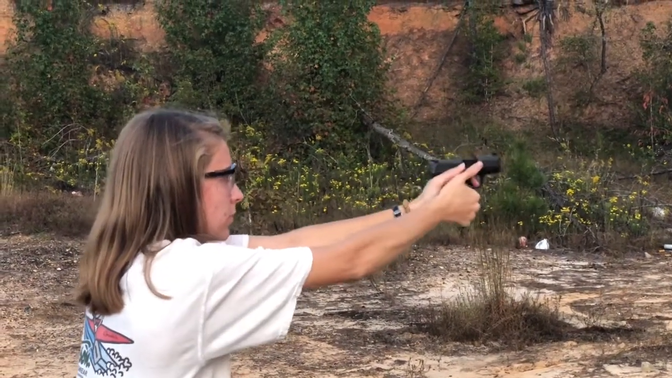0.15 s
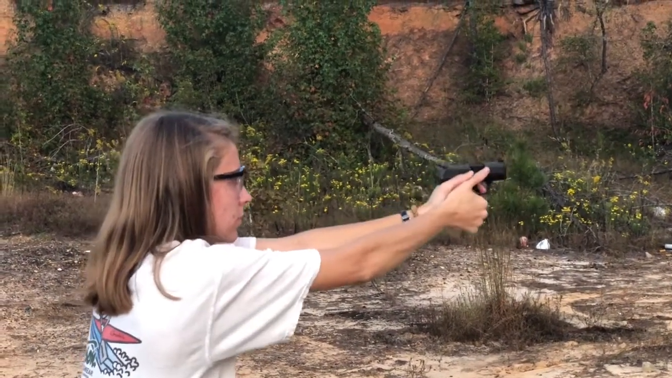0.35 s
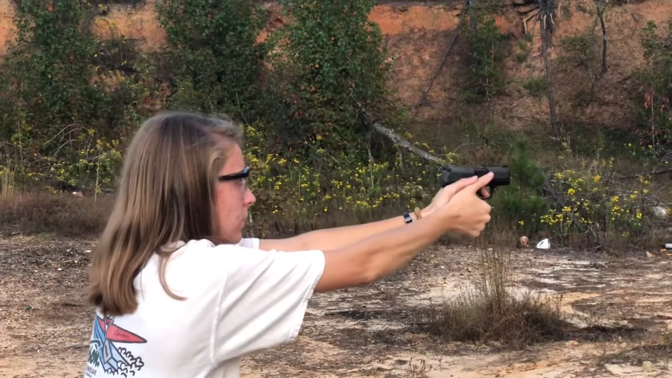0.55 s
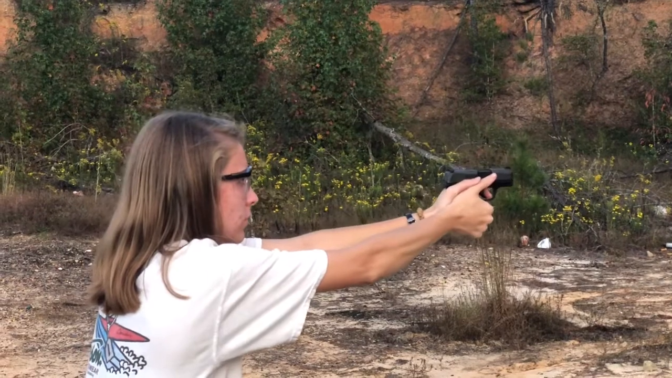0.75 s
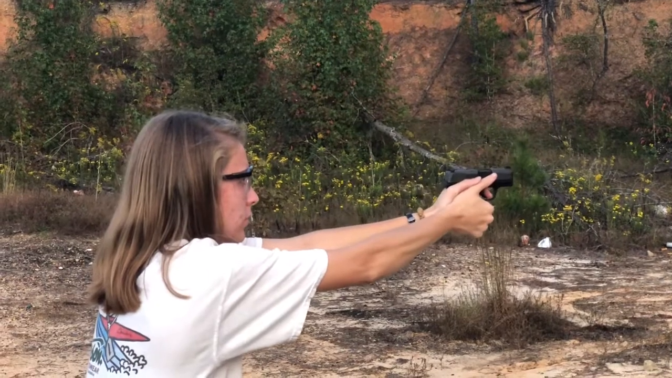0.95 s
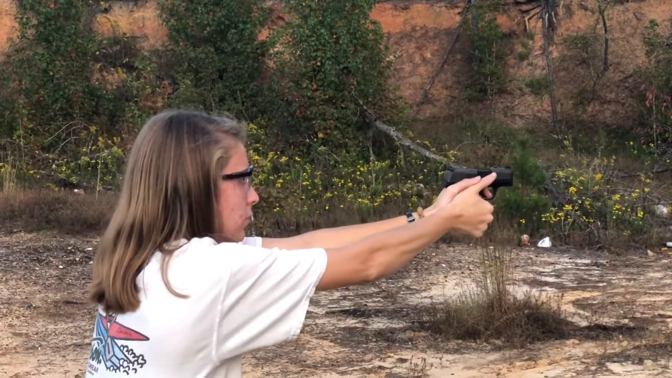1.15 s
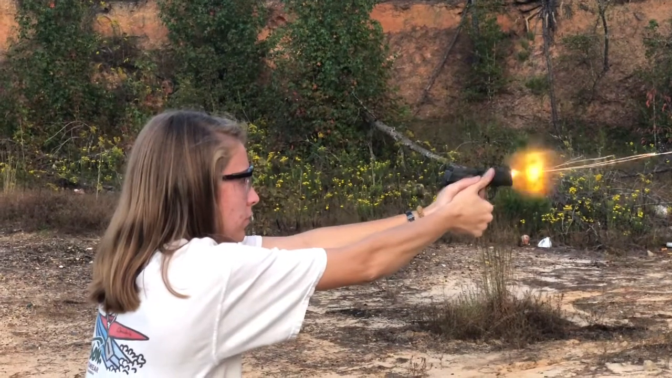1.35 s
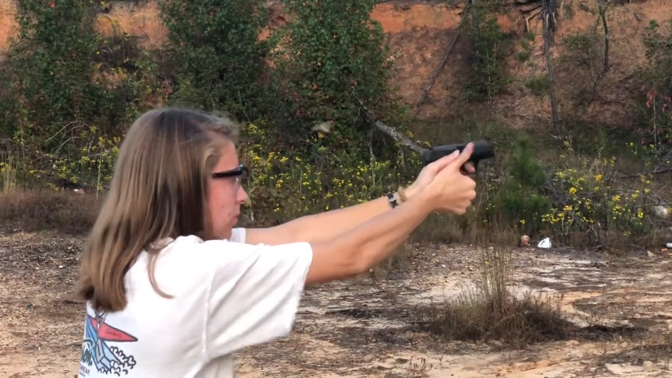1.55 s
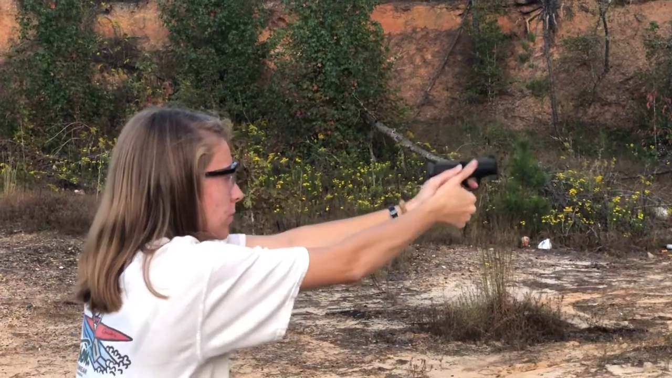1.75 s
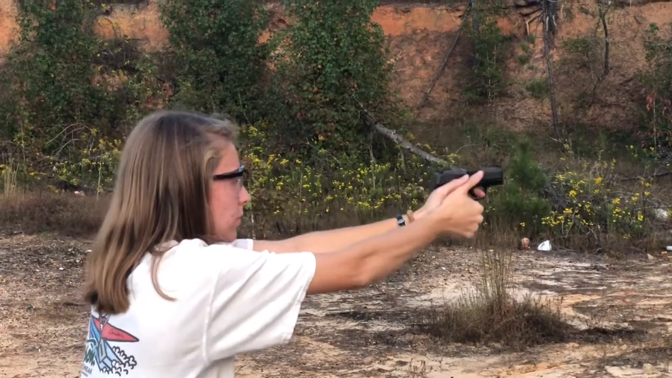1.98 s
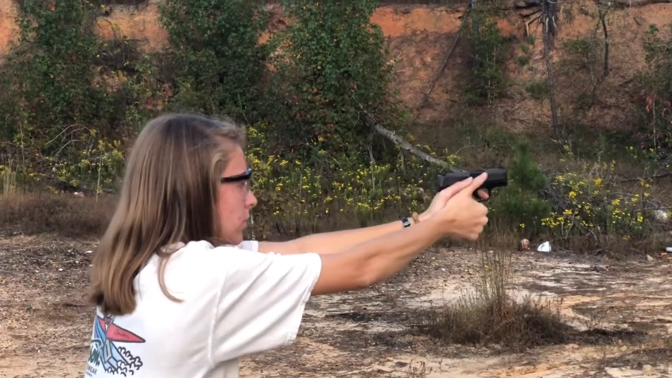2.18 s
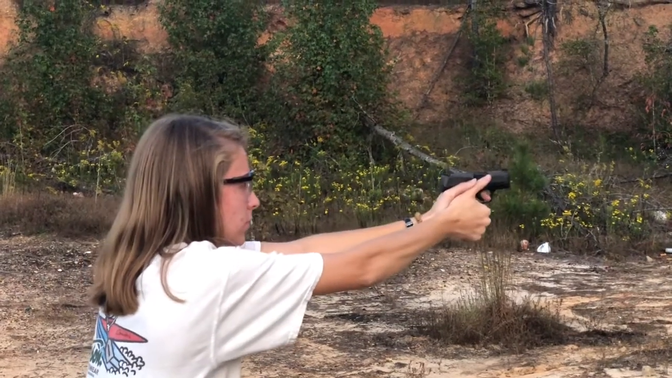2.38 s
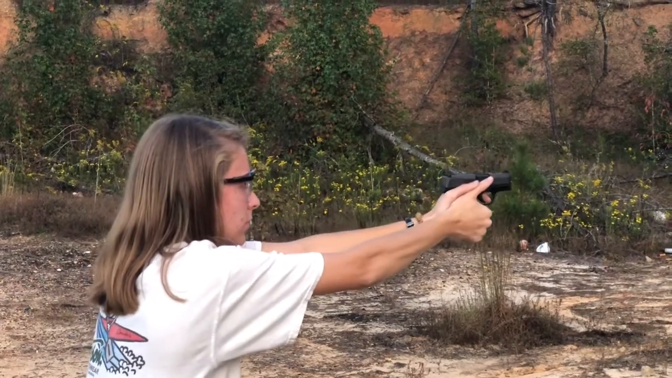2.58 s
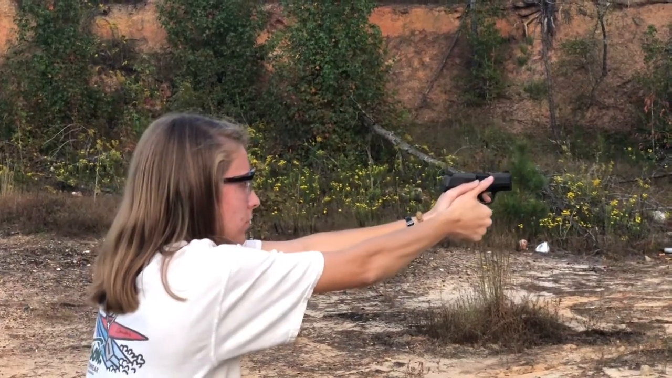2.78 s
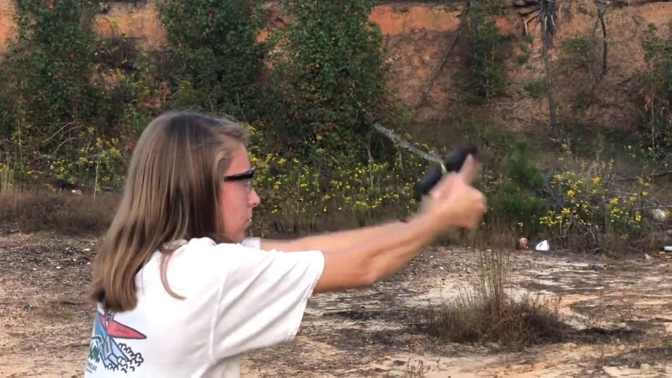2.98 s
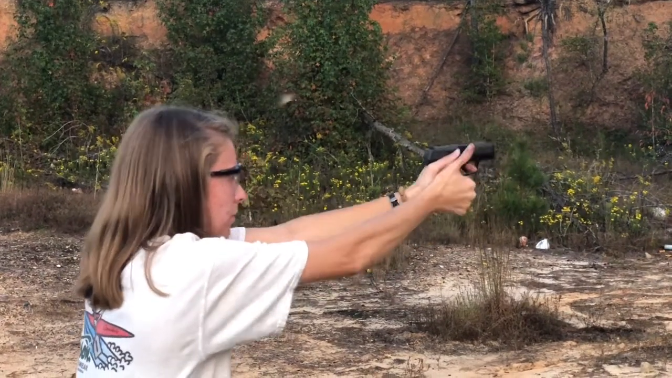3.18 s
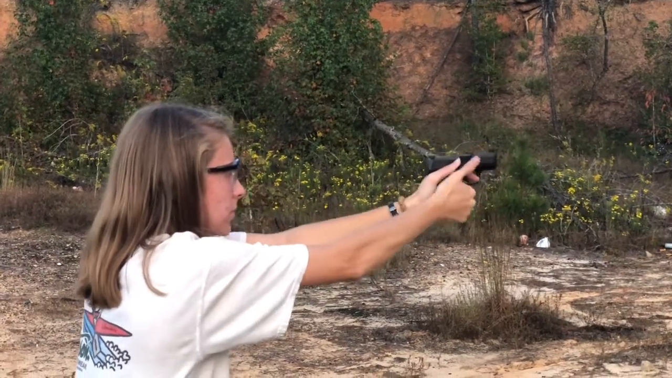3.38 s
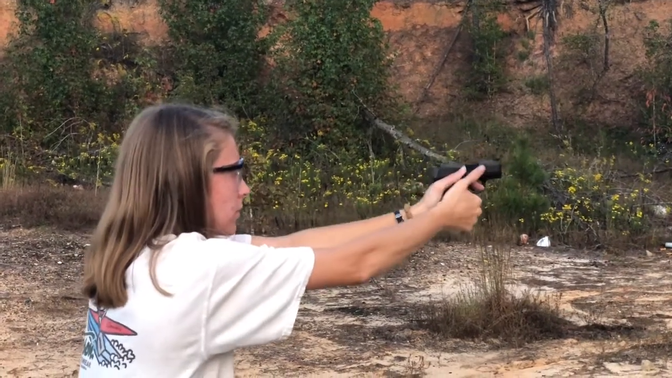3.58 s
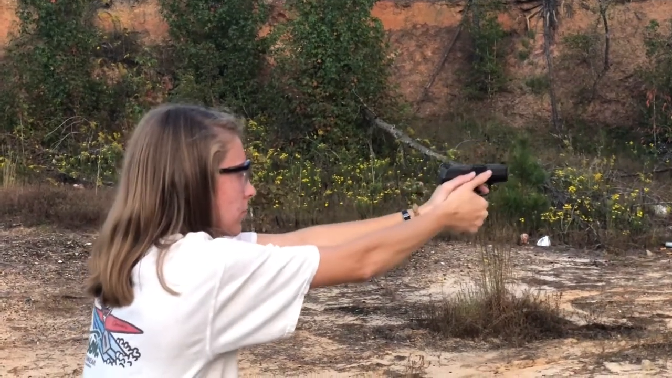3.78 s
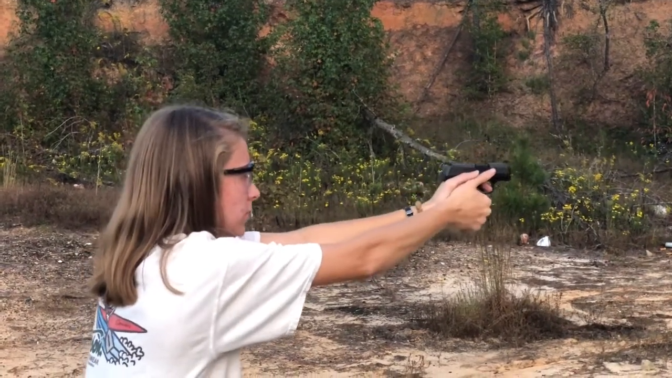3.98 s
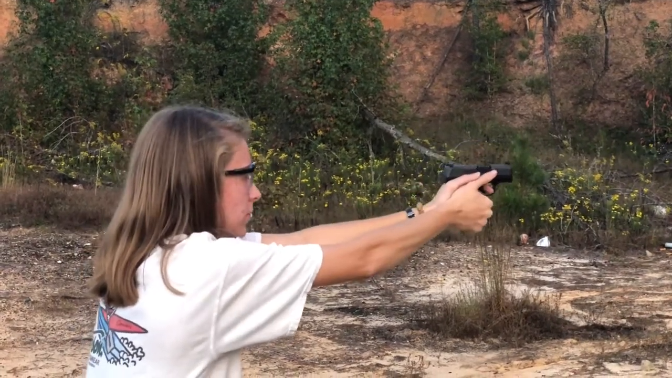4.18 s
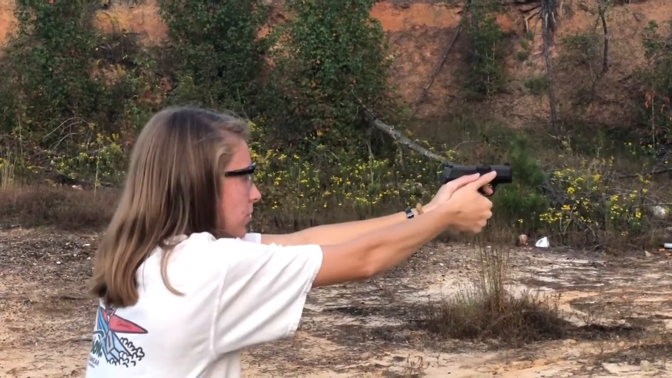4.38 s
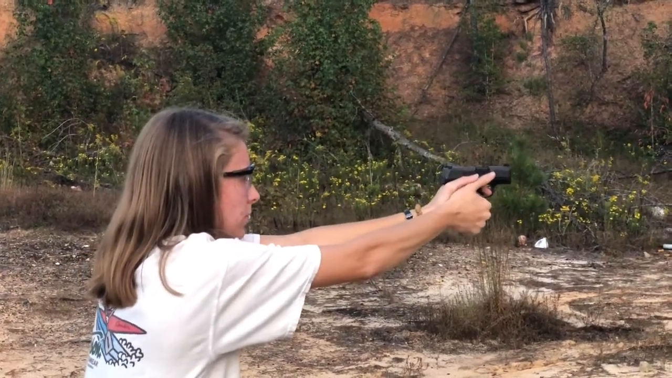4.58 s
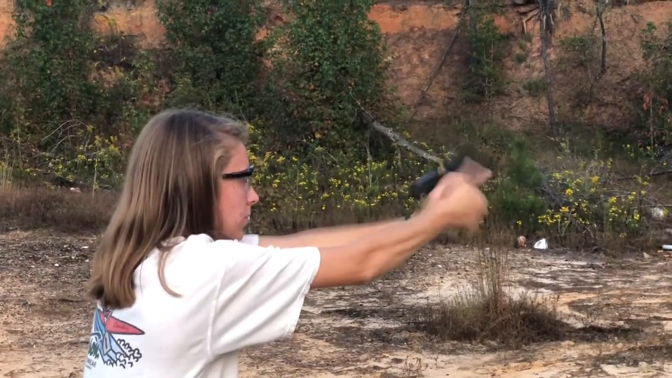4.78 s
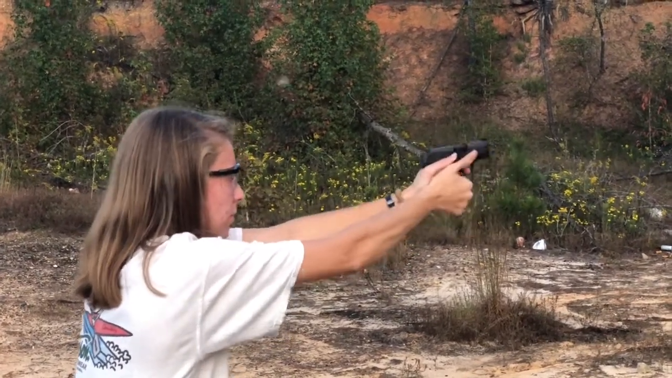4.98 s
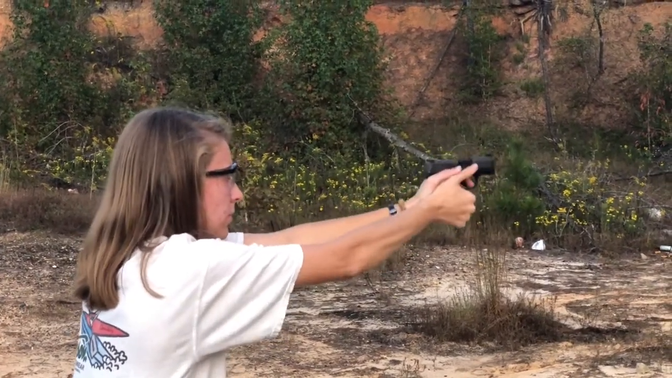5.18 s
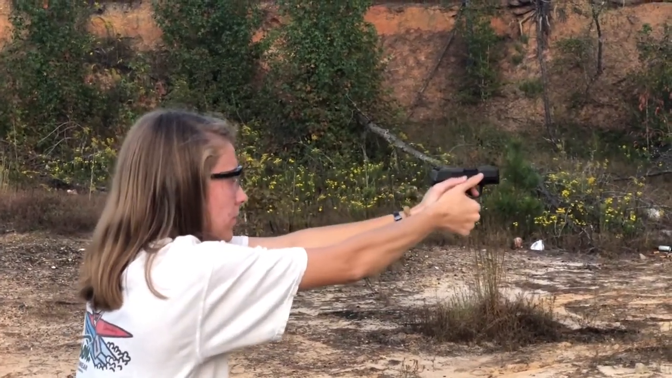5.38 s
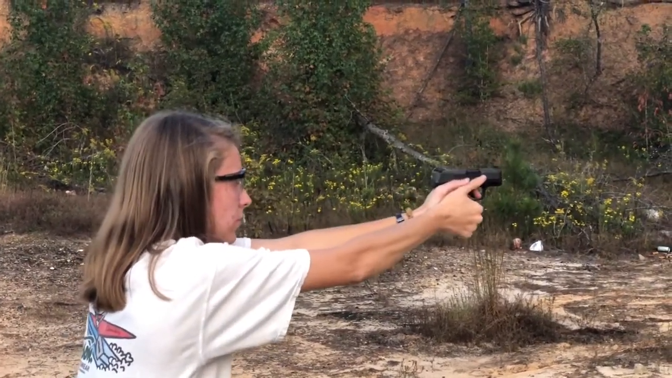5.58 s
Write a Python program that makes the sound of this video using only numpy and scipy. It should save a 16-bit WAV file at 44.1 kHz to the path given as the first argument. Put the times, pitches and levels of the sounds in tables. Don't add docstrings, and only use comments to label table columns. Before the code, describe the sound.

Three spaced pistol shots crack and overload the microphone outdoors, each echoing off banks and trees, with faint clicks and falling brass between.

```python
import sys
import numpy as np
from scipy import signal
from scipy.fft import rfft, irfft
from scipy.io import wavfile
from scipy.ndimage import uniform_filter1d

SR = 44100
rng = np.random.default_rng(int(sys.argv[2]) if len(sys.argv) > 2 else 0)


def elevation(decibels):
    levels = np.asarray(decibels, float)
    return 10 ** (levels / 20)


def digitize_waveform(pressure):
    field = np.atleast_2d(pressure).T
    bounded = np.clip(field, -1, 1)
    quanta = np.round(bounded * 32767).astype(np.int16)
    wavfile.write(sys.argv[1], SR, quanta)


N = 248724
ECHO_N = int(1.8 * SR)

# [f/Hz, level/dB per Hz]
AIR_SPECTRUM = [(25, -15), (45, -3), (75, 4), (130, -4.5), (250, -14.5), (400, -14), (700, -10.5),
                (1200, -3.5), (1900, -21), (3000, -21), (5000, -27.5), (8500, -29), (12000, -31),
                (16000, -28)]
AIR_DB = -66
INSECT_HZ, INSECT_WIDTH_HZ, INSECT_DB = 3990, 740, -72.5
DUCK_DB, DUCK_HOLD_S, DUCK_BACK_S = -12.5, 0.56, 0.44
# [busiest t/s, rate/grains per s]
RUSTLES = [
    (1.05, 90),
    (2.6, 400),
    (4.4, 430),
]
RUSTLE_DB, RUSTLE_SPREAD_S, RUSTLE_REST_PER_S = -85, 0.27, 26
# [t/s, peak level/dB, f/Hz]
TRIGGER_TICKS = [(1.1514, -64, 8800), (1.312, -52, 7000), (2.3957, -62, 9100), (2.4323, -61, 8700),
                 (2.4687, -56, 10200), (2.5081, -54.5, 11200), (2.5914, -56, 13600), (2.8074, -64, 7800),
                 (2.8533, -61, 6500), (2.9011, -57, 10900), (3.9811, -58, 14000), (4.1846, -60, 7500),
                 (4.22, -62, 9000), (4.3328, -55, 9100), (4.4506, -60, 7800), (4.493, -60, 8300),
                 (4.508, -57, 10500), (4.5623, -63, 6700), (4.5943, -57, 9700), (4.6661, -63, 10400),
                 (4.716, -58, 8700)]
# [t/s, peak level/dB, ring level/dB re peak, knock level/dB re peak, knock f/Hz]
CASE_HITS = [
    (.3142, -52, -28, 7, 2600),
    (.4475, -70, -18, -2, 1600),
    (2.0812, -51, -26, -8, 1600),
    (2.1624, -69, -10, -4, 1800),
    (3.7128, -51, -12, 5, 4300),
    (3.856, -64, -12, -4, 1700),
    (5.5494, -57, -24, -2, 1600),
]
# [f/Hz, level/dB, t60/s]
BRASS_MODES = [(10170, 0, .15), (10290, -6, .12)]
# [f/Hz, level/dB, t60/s]
SAND_MODES = [(1500, -3, .007), (450, -9, .02)]
# [t/s after crack, peak level/dB, f/Hz]
SLIDE_CLACKS = [(0.0392, -18, 10970), (0.05, -19, 9000), (.0545, -15, 8574)]
# [t/s after crack, peak level/dB, f/Hz]
BANK_FACES = [(.0332, -15, 1580), (.0519, -20.5, 842), (.0834, -26.5, 765), (.0951, -12, 1360),
              (.1168, -17, 1000), (.126, -13.5, 900), (.1319, -10.5, 700), (.139, -15.5, 756),
              (.1462, -13, 895.4), (.154, -13.5, 749), (.1701, -16.5, 674.2), (.1929, -24, 467),
              (.2019, -22.5, 685), (.2276, -27.5, 1130), (.2459, -32, 450), (.2697, -28.5, 980),
              (.291, -29, 453), (.3269, -41.5, 379), (.3895, -46.5, 660), (.4145, -58, 1060),
              (.481, -48, 603), (.483, -50, 2010), (.5261, -50, 1410), (.5715, -56, 1050), (.612, -54, 603)]
FACE_CRACK_DB = -17
# [f/Hz, level/dB]
PIT_COLOUR = [(40, -5), (100, -9.5), (200, -5.5), (330, -4.5), (500, -0.5), (750, 2), (1200, 1.5),
              (1700, -7.5), (2400, 2.5), (3300, 0), (5000, -5), (10000, -1), (15500, -9.5)]
# [t/s after crack, level/dB]
RETURN_STRENGTH = [
    (.006, -27),
    (.027, -38.5),
    (.032, -28),
    (.055, -27),
    (.07, -30.5),
    (.15, -31),
    (.29, -58),
    (.48, -76.5),
    (1.3, -106),
]
# [f/Hz, level/dB per Hz]
RETURN_SPECTRUM = [(120, -43), (700, -31), (2400, -34.5), (9000, -38.5)]
DULLING_DB_PER_OCTAVE, DULLING_HZ, DULLING_S = -2.5, 9000, 0.44
AIR_LOSS_DB_PER_S = -18.5
# [t/s after crack, level/dB per Hz, length/s, f/Hz]
SURFACE_BOOMS = [(.008, -55, .012, 150), (.033, -65, .012, 90.8), (0.057, -64.5, .01, 110.7),
                 (0.169, -56, 0.02, 120), (.29, -82, 0.034, 111), (0.034, -58.5, .006, 1500),
                 (.142, -56, .02, 750), (.2, -69.5, .03, 550), (0.3, -79, 0.017, 1504),
                 (0.02, -51, 0.012, 68.23), (.45, -95.5, 0.14, 200)]
BOOM_OCTAVES = 0.58
# [t/s after crack, level/dB per Hz, length/s, f/Hz, width/octaves]
FAR_TREES = [(.48, -106, 0.068, 2800, 0.9), (.72, -109, .17, 2700, 1.1), (1.05, -112, 0.22, 2400, 0.67),
             (.66, -103, .05, 1000, .9), (.81, -100, .12, 1300, .8), (1.15, -101, .3, 1000, 1.2)]
# [f/Hz, width/Hz, level/dB]
PATH_NOTCH = (2780, 300, -7)
# [t/s after crack, peak level/dB, f/Hz, cycles]
MUZZLE_GAS = [(0.002, -7, 1170, 4.3), (.0041, -4.5, 680, 2.6), (0.0062, -12.5, 470, 3.2),
              (.0092, -11, 530, 2.1), (.004, -11.5, 230, 0.95), (0.0095, -29.5, 110, 1.3),
              (.002, -9, 2330, 5), (0.0053, -12.5, 1850, 5)]
GROUND_S, GROUND_DB = .005, -3
# [t/s, blast level/dB, gain dip/dB, lead-in f/Hz, lead-in level/dB]
SHOT_EVENTS = [
    (-.398, 0.5, -10.5, 1500, -12),
    (1.3568, 1.5, -13, 2490, -9),
    (2.9577, 0.15, -6.5, 687.5, -14),
    (4.769, -0.08, -10.5, 1302, -13),
]
ECHO_DB = -1.37
DIP_S, DIP_LENGTH_S = .0558, .0105


def bell(hz, centre_hz, octaves):
    return np.exp(-(np.log2(hz / centre_hz) / octaves) ** 2)


def band(x, hz, octaves):
    f = np.maximum(np.fft.rfftfreq(len(x), 1 / SR), 1)
    y = irfft(rfft(x) * bell(f, hz, octaves), len(x))
    return y / np.std(y)


def noise_band(n, hz, octaves):
    return band(rng.standard_normal(n), hz, octaves)


def along(table, hz):
    table_hz, table_db = np.transpose(table)
    return np.interp(np.log(hz), np.log(table_hz), table_db)


def walk(rate_hz):
    hold = int(SR / rate_hz)
    steps = np.repeat(rng.standard_normal(N // hold + 1), hold)
    return 0.4 * uniform_filter1d(steps, hold)[:N]


def ring(modes, seconds):
    t = np.arange(int(seconds * SR)) / SR
    return sum(elevation(db - 60 * t / t60_s) * np.sin(2 * np.pi * hz * t) for hz, db, t60_s in modes)


def puff(hz, octaves, decay_s):
    t = np.arange(1024) / SR
    return noise_band(len(t), hz, octaves) * np.exp(-t / decay_s) / 2


def thud(db, hz, cycles):
    t = np.arange(-512, 512) / SR
    return elevation(db) * np.cos(2 * np.pi * hz * t) * np.exp(-(2 * t * hz / cycles) ** 2)


def add(out, x, s):
    i = int(round(s * SR))
    a, b = np.clip([i, i + len(x)], 0, len(out))
    out[a:b] += x[a - i:b - i]


def countryside():
    air = 0
    for hz in 30 * 2 ** np.arange(0, 9.1, .5):
        db = along(AIR_SPECTRUM, hz) + 1.5 * walk(9.6)
        air = air + elevation(db) * np.sqrt(hz) * noise_band(N, hz, .36)
    f = np.fft.rfftfreq(N, 1 / SR)
    chorus_shape = 1 / (1 + (2 * (f - INSECT_HZ) / INSECT_WIDTH_HZ) ** 6)
    chorus = irfft(rfft(rng.standard_normal(N)) * chorus_shape, N)
    out = air / np.std(air) * elevation(AIR_DB)
    out += chorus / np.std(chorus) * elevation(INSECT_DB + 2.0 * walk(14))
    t = np.arange(N) / SR
    duck = 0
    for s, *_ in SHOT_EVENTS:
        recovery_s = np.clip(t - s - DUCK_HOLD_S, 0, None)
        duck = duck + (t > s) * np.exp(-recovery_s / DUCK_BACK_S)
    return out * elevation(DUCK_DB * duck)


def rustle():
    t = np.arange(N) / SR
    rate = RUSTLE_REST_PER_S + sum(busy * np.exp(-((t - s) / RUSTLE_SPREAD_S) ** 2) for s, busy in RUSTLES)
    grains = (rng.random(N) < rate / SR) * elevation(2.2 * rng.exponential(size=N))
    tail = np.convolve(grains, np.exp(-np.arange(300) / SR / .002))[:N]
    return elevation(RUSTLE_DB) * tail * noise_band(N, 7200, 0.95)


def trigger():
    out = np.zeros(N)
    for s, db, hz in TRIGGER_TICKS:
        add(out, elevation(db + 1.0) * puff(hz, 0.51, 0.001), s)
    return out


def cases():
    out = np.zeros(N)
    for s, db, ring_db, knock_db, knock_hz in CASE_HITS:
        add(out, elevation(db) * puff(11000, .8, .0008), s)
        knock = ring(SAND_MODES, .2)
        add(knock, puff(knock_hz, .9, .0015), 0)
        add(out, elevation(db + ring_db) * ring(BRASS_MODES, .2) + elevation(db + knock_db) * knock, s)
    return out


def scatter(leaves, air, stable_hz=2500):
    t = np.arange(ECHO_N) / SR
    strength_db = np.interp(t, *np.transpose(RETURN_STRENGTH))
    travel = np.minimum(t / DULLING_S, 1)
    grain_db = 2.5 * walk(90)[:ECHO_N]
    swells = []  # (gain, f/Hz, octaves)
    for s, db, length_s, hz in SURFACE_BOOMS:
        swells.append((elevation(db) * np.exp(-((t - s) / length_s) ** 2), hz, BOOM_OCTAVES))
    for s, db, length_s, hz, octaves in FAR_TREES:
        swells.append((elevation(db + grain_db) * np.exp(-((t - s) / length_s) ** 2), hz, octaves))
    out = 0
    for hz in 45 * 2 ** np.arange(0, 8.6, .5):
        db = strength_db + 0.87 * grain_db * travel + along(RETURN_SPECTRUM, hz)
        db += DULLING_DB_PER_OCTAVE * np.log2(max(hz, 500) / DULLING_HZ) * travel
        if hz > 10000:
            db += AIR_LOSS_DB_PER_S * np.minimum(t, .45) * ((hz / 10000) ** 2 - 1)
        gain = elevation(db) + sum(swell * bell(hz, centre_hz, octaves) for swell, centre_hz, octaves in swells)
        same = 1 / (1 + (hz / stable_hz) ** 2)
        sound = band(np.sqrt(same) * leaves + np.sqrt(1 - same) * air, hz, .36)
        out = out + gain * elevation(along(PIT_COLOUR, hz)) * np.sqrt(.35 * hz) * sound
    hz, width_hz, db = PATH_NOTCH
    f = np.fft.rfftfreq(ECHO_N, 1 / SR)
    notch = elevation(db / (1 + ((f - hz) / width_hz) ** 2))
    return irfft(rfft(out) * notch, ECHO_N) * np.clip(t / 0.0018, 0, 1)


def faces():
    out = np.zeros(ECHO_N)
    for s, db, hz in BANK_FACES:
        add(out, thud(db - 3, hz, 2.8), s - 512 / SR)
        add(out, thud(db - 8, 1.6 * hz, 3.5), s - 400 / SR)
        add(out, elevation(db + FACE_CRACK_DB) * puff(3500, .8, .002), s - .001)
    return out


def slide():
    out = np.zeros(ECHO_N)
    for s, db, hz in SLIDE_CLACKS:
        add(out, elevation(db) * puff(hz, 0.37, 0.00053), s)
    return out


def lead_in(hz, db, bang, ahead_s=1024 / SR, swell_s=.0055):
    n = int(ahead_s * SR)
    t = np.arange(n) / SR - ahead_s
    noise = noise_band(n, hz, 0.89) + 0.48 * noise_band(n, 3100, 0.53) + .35 * noise_band(n, 400, .7)
    dull = signal.sosfilt(signal.ellip(6, 1, 50, 3200, fs=SR, output="sos"), noise)
    start = bang[:n]
    copy = start * np.exp(-(t + ahead_s) / .008) + .3 * np.roll(start, n // 2)
    hiss = elevation(-50.0) * rng.standard_normal(n)
    return elevation(-23.5) * copy + hiss + dull * (elevation(db) * np.exp(t / swell_s) + elevation(-45))


def blast():
    out = np.zeros(2048)
    for s, db in ((.0004, 0), (GROUND_S, GROUND_DB)):
        add(out, elevation(db + 2.5) * puff(5500, 1.3, 0.0014), s)
    for s, db, hz, cycles in MUZZLE_GAS:
        add(out, thud(db, hz, cycles), s - 512 / SR)
    return .9 * np.tanh(1.2 * out)


def shots():
    out = np.zeros(N)
    leaves, banks = rng.standard_normal(ECHO_N), faces()
    t = np.arange(ECHO_N) / SR
    dip_edges_s = DIP_S + np.array([0, .001, DIP_LENGTH_S, DIP_LENGTH_S + .006])
    dip = np.interp(t, dip_edges_s, [0, 1, 1, 0])
    ends_s = [s for s, *_ in SHOT_EVENTS[1:]] + [N / SR]
    for (s, blast_db, dip_db, lead_hz, lead_db), end_s in zip(SHOT_EVENTS, ends_s):
        bang = elevation(blast_db) * blast()
        echo = scatter(leaves, rng.standard_normal(ECHO_N)) + banks + slide()
        echo = echo * elevation(blast_db + ECHO_DB + dip_db * dip)
        add(out, echo * (t < end_s - s), s)
        add(out, bang, s)
        lead = lead_in(lead_hz, lead_db, bang)
        add(out, lead, s - len(lead) / SR)
    return out


def scene():
    return (countryside() + rustle() + trigger() + cases() + shots())[None]


def top_cut(x):
    return signal.sosfilt(signal.butter(12, 16800, fs=SR, output="sos"), x)


def record(dry, top=.67, low_hz=45, high_hz=15750):
    held = dry / (1 + np.abs(dry / top) ** 4) ** .25
    held = signal.sosfilt(signal.butter(2, low_hz, "high", fs=SR, output="sos"), held)
    held = signal.sosfilt(signal.ellip(8, .2, 45, high_hz, fs=SR, output="sos"), held)
    return top_cut(held)


dry = scene()
out = record(dry)
digitize_waveform(out)
```